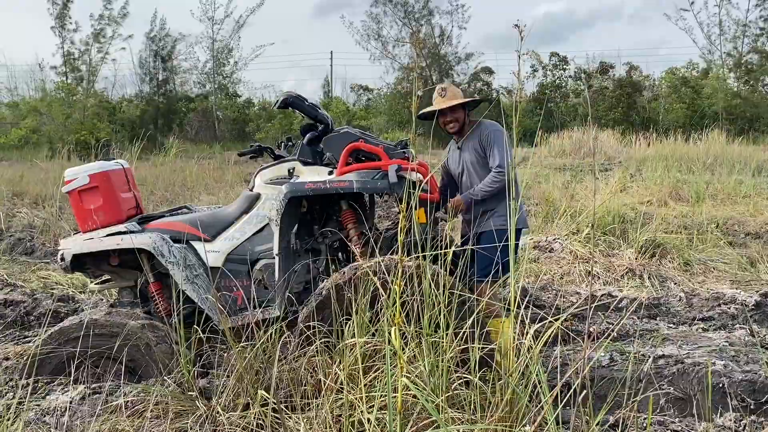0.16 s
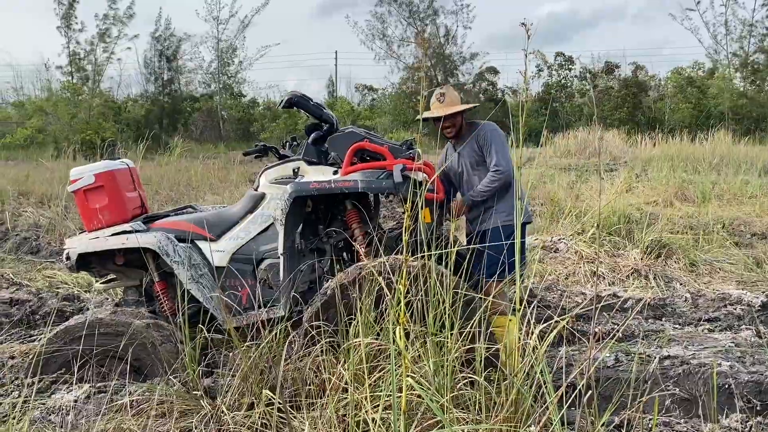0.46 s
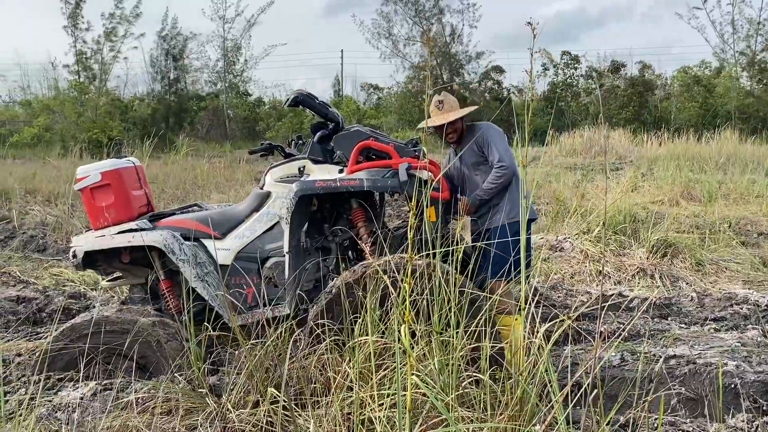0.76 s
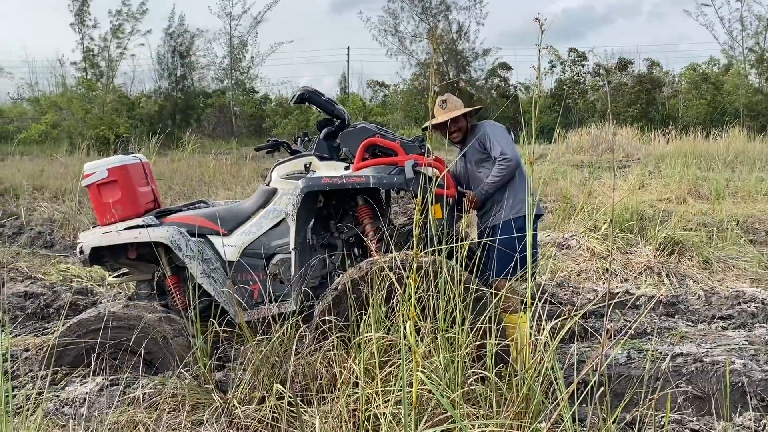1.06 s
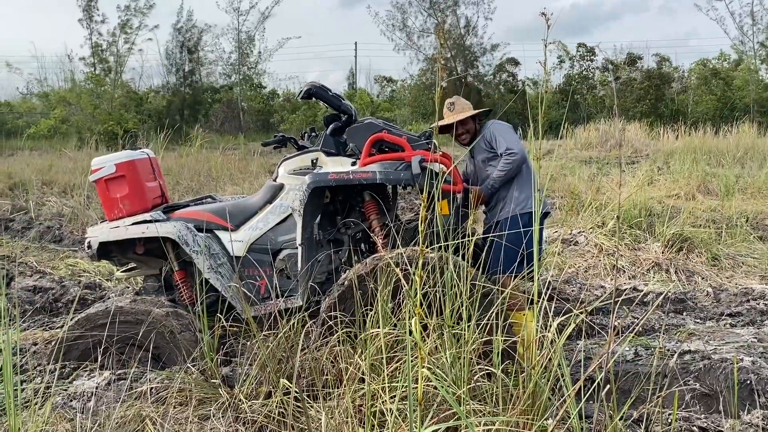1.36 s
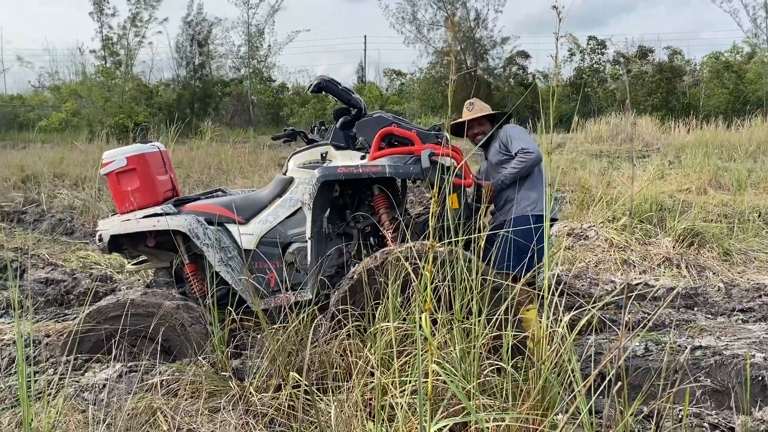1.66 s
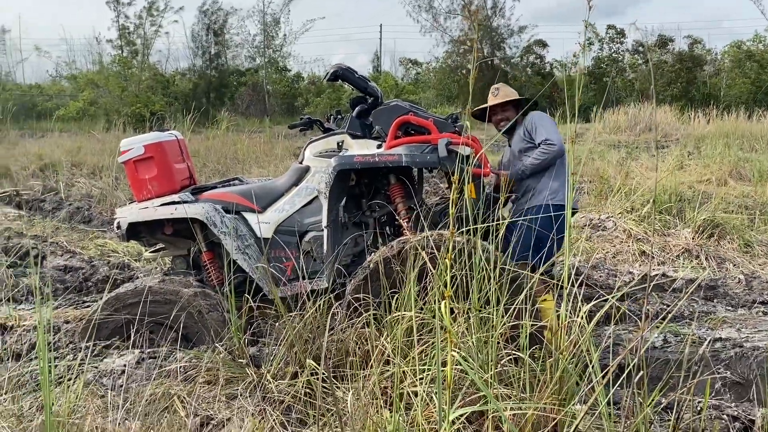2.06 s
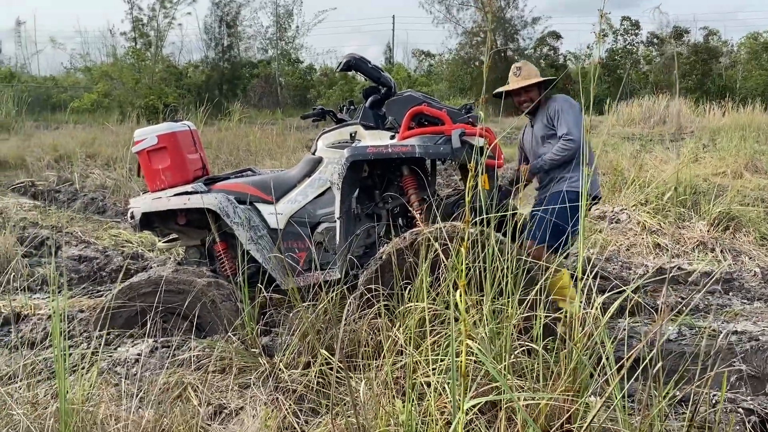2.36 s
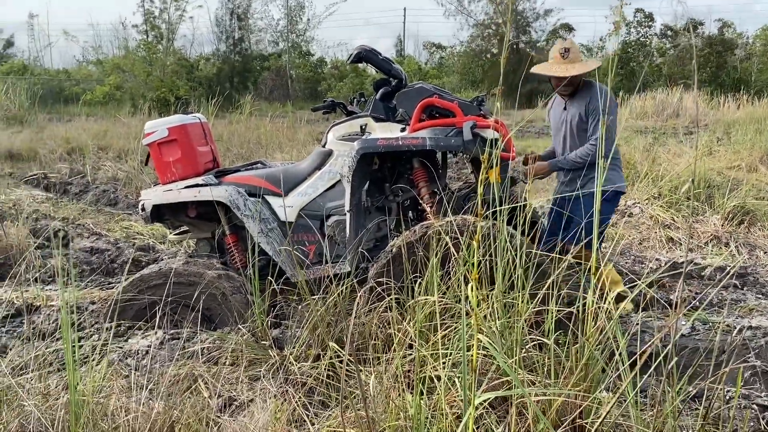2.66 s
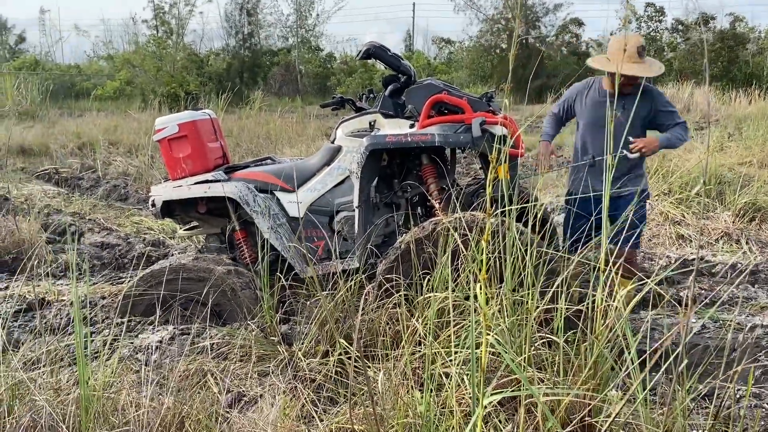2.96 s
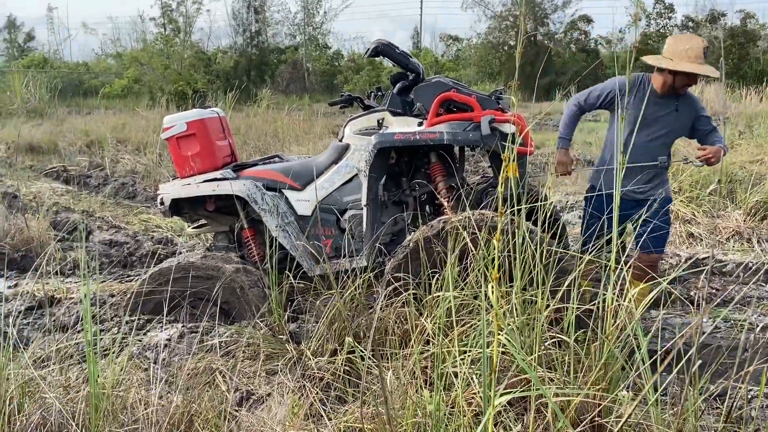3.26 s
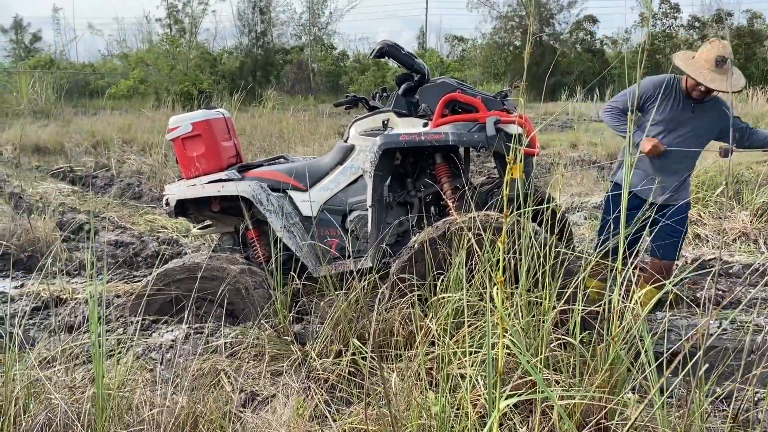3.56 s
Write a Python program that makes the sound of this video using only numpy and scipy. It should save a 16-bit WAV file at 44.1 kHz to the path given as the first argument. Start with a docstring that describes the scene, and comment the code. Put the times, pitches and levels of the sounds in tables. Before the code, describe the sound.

A quad bike engine idles close by outdoors, pulsing quickly and unevenly over a low rumble, with light ticks and knocks. It keeps running as someone brushes through dry grass toward the end, cracking two stalks.

```python
"""A booming, lopsided throb: an all-terrain vehicle idles a few metres away in a muddy field.
Its V-twin fires in uneven pairs, each pulse ringing the silencer. Valve ticks, crankcase knocks,
breathy hiss and tailpipe puffs recur at set crank angles, over a steady whirr and rumble.
Near the end dry grass rustles and two stalks snap as someone steps through it."""
import sys
import numpy as np
from scipy.fft import rfft, irfft, next_fast_len
from scipy.io import wavfile
from scipy.ndimage import uniform_filter1d, minimum_filter1d

SR = 44100
rng = np.random.default_rng(int(sys.argv[2]) if len(sys.argv) > 2 else 0)


def bounce(signal):
    """Save signal as a 16-bit WAV file at the path given by the first command-line argument."""
    frames = np.transpose(np.atleast_2d(signal))
    limited = np.clip(frames, -1, 1)
    pcm = np.round(limited * 32767).astype(np.int16)
    wavfile.write(sys.argv[1], SR, pcm)


N = 163170
RUN_IN = SR // 5  # pre-roll in samples, so the engine is already ringing at the start


def amp(db):
    """Decibels to gain."""
    return 10 ** (np.asarray(db) / 20)


def unit(x):
    """Scale to rms 1."""
    return x / np.sqrt(np.mean(x ** 2) + 1e-20)


def along(points, hz):
    """Read (frequency, value) points on a log frequency axis."""
    f, v = np.transpose(points)
    return np.interp(np.log(hz + 1), np.log(f + 1), v)


def fader(rows):
    """Gain per sample from (time [s], level [dB]) points."""
    return amp(np.interp(np.arange(N) / SR, *np.transpose(rows)))


def filtered(x, response):
    """Pass x through a complex frequency response."""
    n = x.shape[-1]
    padded = next_fast_len(n + SR // 2)
    return irfft(rfft(x, padded) * response(np.fft.rfftfreq(padded, 1 / SR)), padded)[..., :n]


def resonance(f, hz, width):
    """Response of one ringing mode."""
    return 1j * f * width / (hz * hz - f * f + 1j * f * width)


def colour(points):
    """EQ curve through (frequency [Hz], level [dB]) points."""
    return lambda f: amp(along(points, f))


# how alike left and right are (frequency [Hz], likeness [0-1])
STEREO_LIKENESS = [(100, 0.89), (500, .85), (1000, 0.54), (1500, 0.69), (3500, 0.39), (5600, 0.19),
                   (8000, 1), (15000, 0.99)]
def noise(response, envelope=1):
    """Partly alike stereo noise, shaped by an envelope, then coloured and scaled to rms 1."""
    def mid_side_response(f):
        spread = np.arccos(np.clip(along(STEREO_LIKENESS, f), 0, 1)) / 2
        return response(f) * np.array([np.cos(spread), np.sin(spread)])
    mid, side = filtered(envelope * rng.standard_normal((2, N)), mid_side_response)
    return unit(np.array([mid + side, mid - side]))


CYCLES, FIRST_FIRING_S, HIT_SCATTER_DB = 49, .0645, 1
# the wavering idle (time [s], speed [rpm])
IDLE_SPEED = [(0.0, 1456), (0.2, 1388), (0.36, 1416), (0.44, 1486), (0.6, 1527), (0.79, 1448), (0.89, 1387),
              (1.06, 1479), (1.17, 1436), (1.52, 1525), (1.6, 1420), (1.79, 1506), (1.95, 1452),
              (2.3, 1491), (2.5, 1392), (2.95, 1454), (3.19, 1385), (3.38, 1474), (3.7, 1438)]
def crank_samples(degrees, scatter_deg=0):
    """Samples, pre-roll included, at which the crank passes an angle in each two-turn cycle."""
    t = np.arange(-RUN_IN, N, 50) / SR
    rpm = np.interp(t, *np.transpose(IDLE_SPEED))
    cycles = np.cumsum(rpm) * (t[1] - t[0]) / 120
    cycles -= np.interp(FIRST_FIRING_S, t, cycles)
    marks = np.arange(-2, CYCLES - 2) + (degrees + scatter_deg * rng.standard_normal(CYCLES)) / 720
    return (np.interp(marks[marks < cycles[-1]], cycles, t) * SR).astype(int) + RUN_IN


def pulses(samples, scatter_db):
    """One impulse of slightly random size at each given sample."""
    sizes = amp(scatter_db * rng.standard_normal(CYCLES))
    return np.bincount(samples, sizes[:len(samples)], N + RUN_IN)


def bursts(rows):
    """Envelope of short bursts that recur at their crank angles."""
    power, t = np.zeros(N + SR), np.arange(SR // 8) / SR
    for degrees, db, attack, decay in rows:
        shape = (1 - np.exp(-t / attack)) * np.exp(-t / decay)
        for start, chance in zip(crank_samples(degrees), rng.standard_normal(CYCLES)):
            power[start:][:len(t)] += (amp(db + HIT_SCATTER_DB * chance) * shape / shape.max()) ** 2
    return np.sqrt(power[RUN_IN:][:N])


def struck(hits, modes, rattle_db):
    """Metal contacts at crank angles: a clean ring and a short rattle in the same modes."""
    body = lambda f: sum(amp(db) * resonance(f, hz, width) for hz, width, db in modes)
    blows = sum(amp(db) * pulses(crank_samples(degrees, scatter_deg=3), HIT_SCATTER_DB)
                for degrees, db, *_ in hits)
    ring = unit(filtered(blows, body)[RUN_IN:])
    return ring + amp(rattle_db) * noise(body, bursts(hits))


# silencer modes (frequency [Hz], width [Hz], first cylinder's drive [gain], second's drive [gain])
SILENCER_MODES = [(62.4, 7.1, -3, -0.63), (89.35, 11.36, 5.5, 3), (124.8, 78.4, -2, -0.66),
                  (173.1, 11.07, 4.5, -3.5), (192.4, 22, 1.5, 2), (212, 14, 0.58, 0.07),
                  (237.3, 7.7, -0.1, 1.93), (295, 22, -0.46, 0.09), (420, 39, 0.13, 0.31),
                  (512, 25, .5, .5)]
# scatter of each mode's drive from firing to firing (first cylinder [dB], second cylinder [dB])
DRIVE_SCATTER_DB = [0.25, 2]
# fader ride on the boom (time [s], level [dB])
BOOM_LEVEL = [(0, -11.5), (.9, -10.5), (1.6, -10), (3.7, -10)]
def exhaust_boom(low_cut_hz=53, high_cut_hz=235):
    """Each cylinder's pulse rings the silencer's modes in its own mix; the second fires less evenly."""
    firings = [crank_samples(0), crank_samples(275, scatter_deg=6.44)]
    boom = 0
    for hz, width, *drives in SILENCER_MODES:
        push = sum(drive * pulses(at, db) for drive, at, db in zip(drives, firings, DRIVE_SCATTER_DB))
        boom = boom + filtered(push, lambda f: resonance(f, hz, width))
    lowpass = lambda f, hz: 1 / (1 + 1j * f / hz - (f / hz) ** 2)
    highpass = lambda f, hz: -(f / hz) ** 2 * lowpass(f, hz)
    muffled = filtered(boom, lambda f: highpass(f, low_cut_hz) * lowpass(f, high_cut_hz) ** 2)
    return fader(BOOM_LEVEL) * unit(muffled[RUN_IN:])


# valve hits (crank angle [deg], level [dB], rattle attack [s], rattle decay [s])
VALVE_HITS = [(440, -0.5, .001, .003), (461, -3.5, 0.0011, 0.0068), (485, -7.5, 0.0011, 0.006),
              (41.86, -10.5, .001, .002)]
# bright ring of the cylinder head (frequency [Hz], width [Hz], level [dB])
HEAD_MODES = [(2162, 150, 0), (2540, 72, 3.5), (3206, 73, -2), (3511, 90, 2), (3840, 48, -4.5),
              (4450, 79, -13.5), (5920, 300, -22.5), (7670, 570, -15)]
# fader ride on the ticks (time [s], level [dB])
VALVE_LEVEL = [(0, -54.5), (1.5, -52.5), (2.5, -50.5), (3.7, -50)]
def valve_ticks():
    """The valves tap the cylinder head and set it ringing."""
    return fader(VALVE_LEVEL) * struck(VALVE_HITS, HEAD_MODES, rattle_db=-2.5)


# crankcase hits (crank angle [deg], level [dB], rattle attack [s], rattle decay [s])
CASE_HITS = [(145.6, -2, .002, 0.0019), (227.2, -1, .001, 0.0038), (601, -5.5, .002, 0.0036),
             (668, 0, .002, 0.0023)]
# midrange ring of the crankcase (frequency [Hz], width [Hz], level [dB])
CASE_MODES = [(950, 53, -4), (1281, 48, 0), (1506, 45, 4), (1606, 37, -5)]
# fader ride on the knocks (time [s], level [dB])
CASE_LEVEL = [(0, -52), (1.5, -48), (2.4, -47), (3, -50), (3.7, -54.5)]
def crankcase_knocks():
    """Four metal contacts a cycle ring the crankcase, lower than the ticks."""
    return fader(CASE_LEVEL) * struck(CASE_HITS, CASE_MODES, rattle_db=-1.5)


# hiss envelopes (crank angle [deg], level [dB], attack [s], decay [s])
HISS_BURSTS = [(-6, 0, .004, 0.0054), (39.5, -1, 0.0014, 0.011), (426, -1.5, 0.0033, .007)]
# breathy hiss tone (frequency [Hz], level [dB])
HISS_EQ = [(200, -24.5), (500, 6), (1000, 2), (1800, -7), (2400, 0), (3300, -14.5), (4600, -9), (5200, -14),
           (6000, -10), (7600, -14), (10000, -13.5), (15500, -14.5)]
# fader ride shared by hiss and whirr (time [s], level [dB])
HISS_WHIRR_LEVEL = [(0, -2), (.6, -1), (1.5, 1), (2.3, 1.5), (3.7, 1.5)]
def breathy_hiss():
    """Short breathy bursts of hiss sound with the first firing and with the valve ticks."""
    return fader(HISS_WHIRR_LEVEL) * noise(colour(HISS_EQ), bursts(HISS_BURSTS))


# puff envelopes (crank angle [deg], level [dB], attack [s], decay [s])
PUFF_BURSTS = [(40.6, -3, 0.0027, 0.039), (280, -3.5, 0.0024, 0.024)]
# hollow puff tone (frequency [Hz], level [dB])
PUFF_EQ = [(100, -20), (300, 2.5), (375, -5), (460, -8), (520, 3.5), (620, -2.5), (800, -12), (1200, -11.5),
           (2000, -24.5), (5000, -36.5)]
def tailpipe_puffs():
    """Gas rushes from the tailpipe, one puff for each firing."""
    return noise(colour(PUFF_EQ), bursts(PUFF_BURSTS))


# dark, broad whirr tone (frequency [Hz], level [dB])
WHIRR_EQ = [(20, 9.5), (60, 6.5), (200, 10), (380, 3.5), (550, 5), (1050, -2.5), (1600, -1.5), (1950, -10),
            (2600, -8.5), (4000, -12.5), (5200, -17.5), (8000, -21.5), (15500, -24)]
def engine_whirr():
    """The running engine lays down a bed of noise that swells slightly."""
    return fader(HISS_WHIRR_LEVEL) * noise(colour(WHIRR_EQ))


# bass-heavy rumble tone (frequency [Hz], level [dB])
RUMBLE_EQ = [(25, -20.5), (60, -3.5), (110, -2), (175, -4), (215, -1), (245, -5), (280, -18.5),
             (370, -33.5), (700, -68.5)]
def silencer_rumble():
    """Steady turbulence in the silencer fills the gaps between firings."""
    return noise(colour(RUMBLE_EQ))


# swish of each stride (centre time [s], half length [s], level [dB])
STRIDE_SWELLS = [(2.3, .3, -60), (2.852, 0.091, -47.5), (3.014, .11, -44.5), (3.56, 0.15, -42)]
# dry rustle tone (frequency [Hz], level [dB])
GRASS_EQ = [(200, -10), (600, 6.5), (1300, 3.5), (2500, 1), (4200, 3), (7000, -13.5), (10000, -18),
            (15500, -24)]
def grass_rustle(grain_db=2.5):
    """Strides brush through dry grass in grainy swishes."""
    t = np.arange(N) / SR
    swish = sum(amp(db) * np.exp(-((t - centre) / half) ** 2) for centre, half, db in STRIDE_SWELLS)
    flicker = unit(uniform_filter1d(rng.standard_normal(N), size=120))
    return swish * noise(colour(GRASS_EQ), amp(grain_db * flicker))


# breaking stalks (time [s], level [dB])
STALK_BREAKS = [(2.961, -35), (3.097, -39)]
def stalk_snaps(decay_s=0.0059):
    """Each dry stalk breaks with a tiny, bright crack."""
    t = np.arange(N) / SR
    envelope = sum(amp(db) * (t > at) * np.exp(-abs(t - at) / decay_s) for at, db in STALK_BREAKS)
    return envelope * noise(lambda f: resonance(f, hz=7000, width=2500))


# pan across the spectrum (frequency [Hz], left over right [dB])
STEREO_BALANCE = [(60, -0.1), (150, 1.8), (250, 3), (500, 4.5), (1000, 0.8), (2000, 2.5), (4000, -0.5),
                  (15000, 0)]
# phase between the channels (frequency [Hz], left lead [rad])
STEREO_LEAD = [(20, 0), (300, .25), (800, 0), (1500, .7), (2300, .3), (6900, .2), (9000, -3.14),
               (11150, -6.28), (13300, -9.42), (15500, -12.57)]
def scene():
    """Mix engine and grass, then place them in stereo by level and phase."""
    engine = exhaust_boom() + valve_ticks() + crankcase_knocks()
    engine = engine + amp(-46.5) * breathy_hiss() + amp(-41.5) * tailpipe_puffs()
    engine = engine + amp(-39) * engine_whirr() + amp(-21.5) * silencer_rumble()
    mix = engine + grass_rustle() + stalk_snaps()
    sides = np.array([[.5], [-.5]])
    pan = lambda f: amp(sides * along(STEREO_BALANCE, f))
    phase = lambda f: np.exp(1j * sides * along(STEREO_LEAD, f))
    return filtered(mix, lambda f: pan(f) * phase(f))


CEILING_DB, LIMITER_S, TOP_HZ = -1, 0.018, 15800
def record(dry):
    """A limiter holds down the strongest firings; a brick-wall filter trims the very top."""
    needed = np.minimum(1, amp(CEILING_DB) / (abs(dry).max(axis=0) + 1e-9))
    span = int(LIMITER_S * SR)
    held = minimum_filter1d(needed, span)
    gain = uniform_filter1d(uniform_filter1d(held, span // 2), span // 2)
    return filtered(dry * gain, lambda f: f < TOP_HZ)


dry = scene()
out = record(dry)
bounce(out)
```